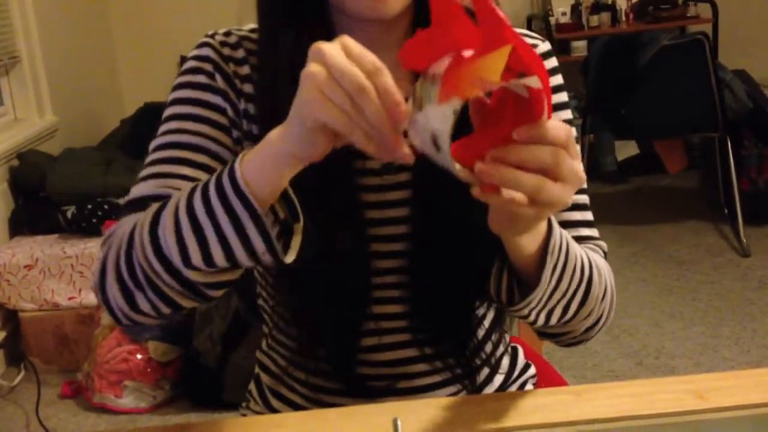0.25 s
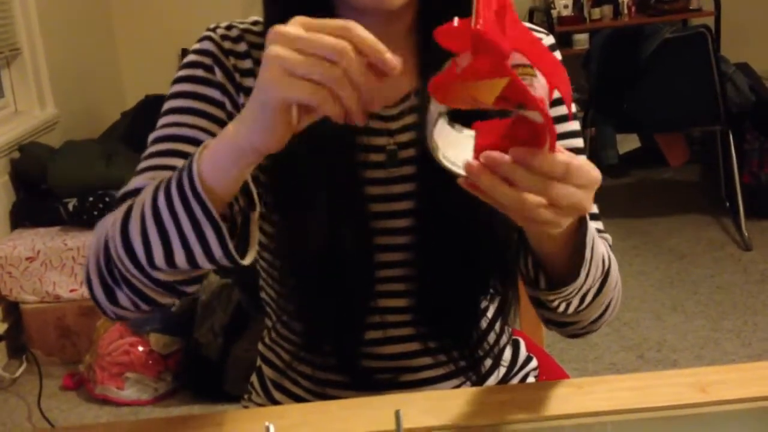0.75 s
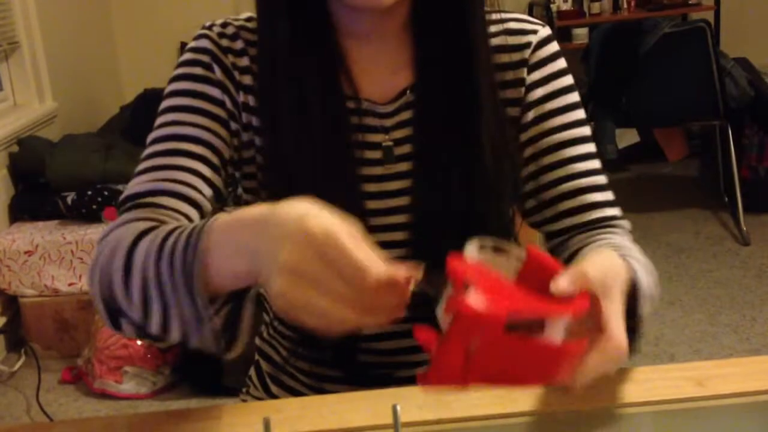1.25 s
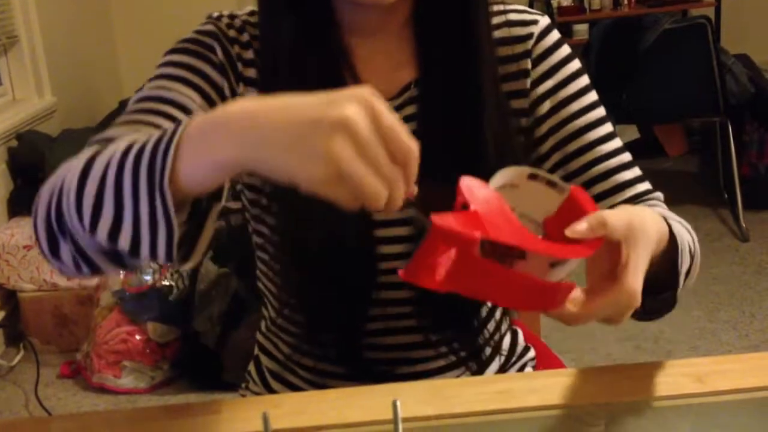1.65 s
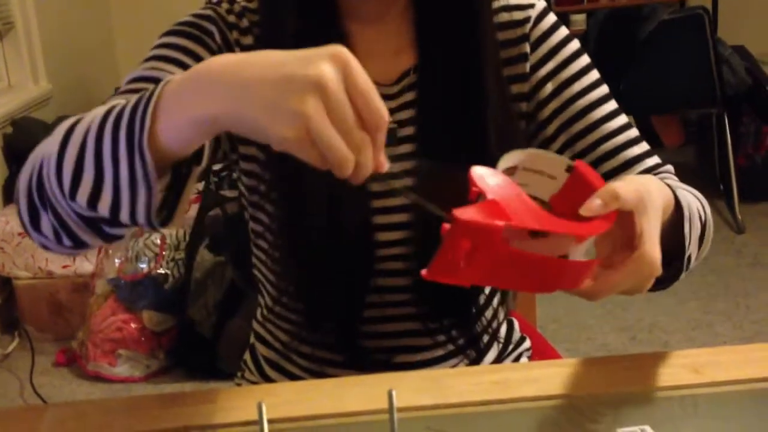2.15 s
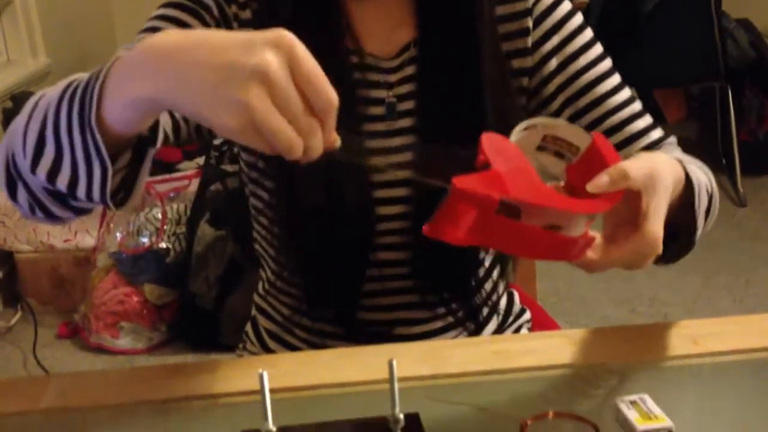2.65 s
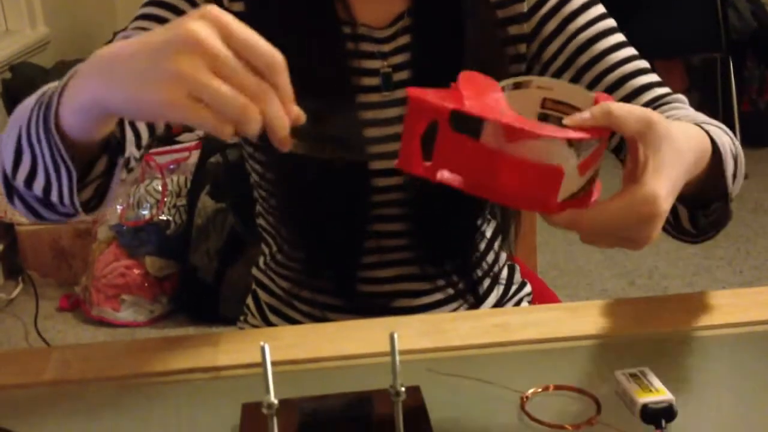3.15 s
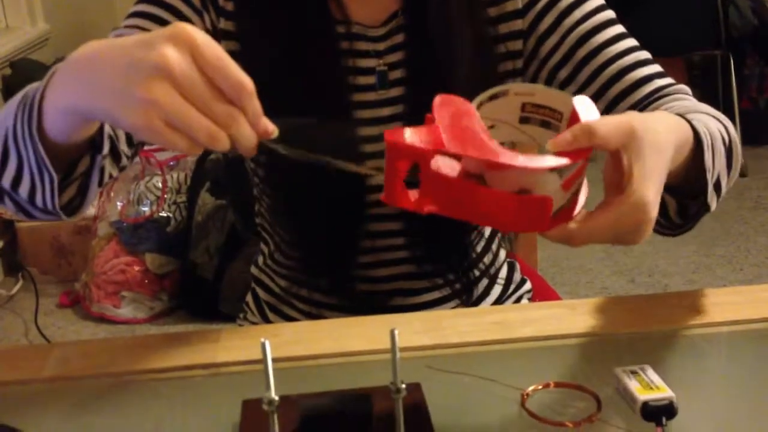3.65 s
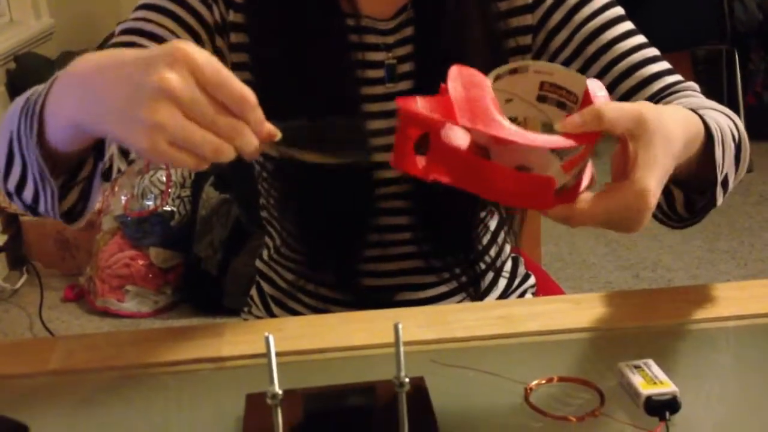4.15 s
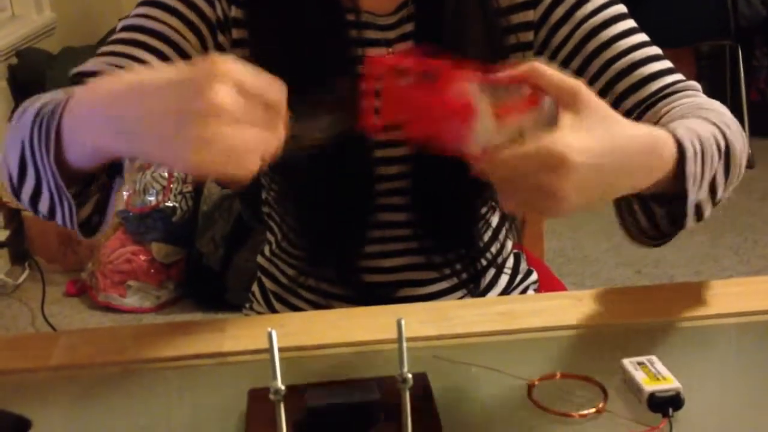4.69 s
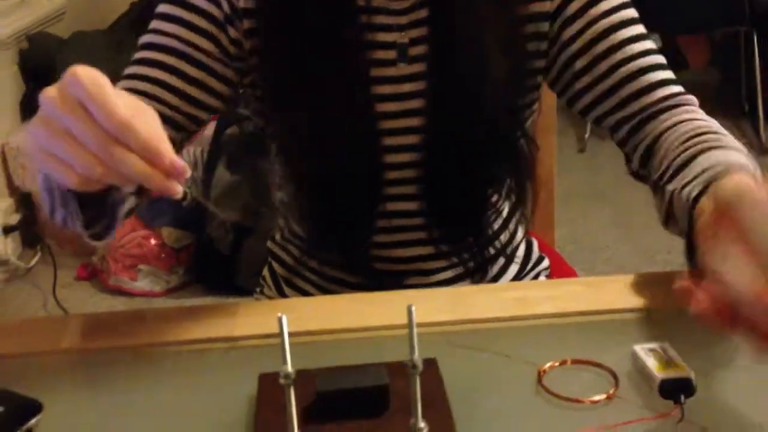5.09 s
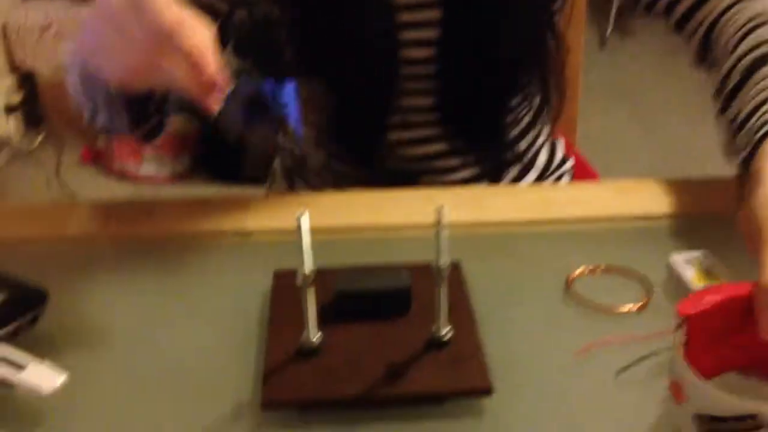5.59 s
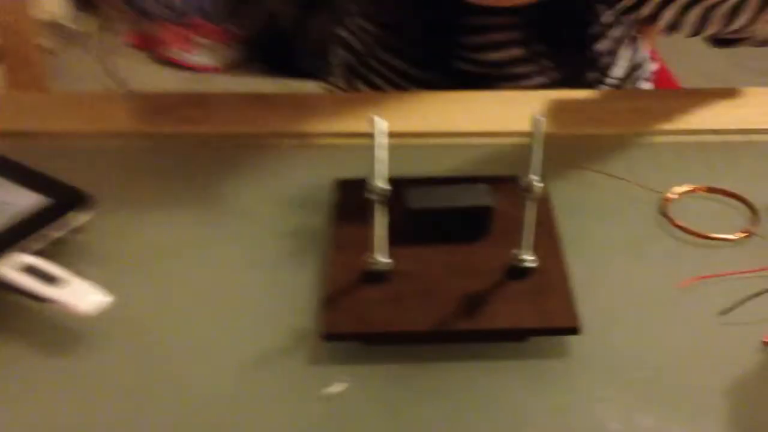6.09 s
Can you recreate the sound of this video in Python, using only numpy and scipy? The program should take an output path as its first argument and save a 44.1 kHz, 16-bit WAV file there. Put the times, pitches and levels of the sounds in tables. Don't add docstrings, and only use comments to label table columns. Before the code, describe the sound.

Sticky tape is jerked off a plastic dispenser in short crackly rips, torn with a ringing snap, then the dispenser knocks down on a table.

```python
import sys
import numpy as np
from scipy import signal
from scipy.fft import rfft, irfft, next_fast_len
from scipy.io import wavfile
from scipy.ndimage import uniform_filter1d, map_coordinates

SR = 44100
rng = np.random.default_rng(int(sys.argv[2]) if len(sys.argv) > 2 else 0)


def wrap_up_sound(samples):
    columns = np.atleast_2d(samples).T
    tamed = np.clip(columns, -1, 1)
    steps = np.round(tamed * 32767).astype(np.int16)
    wavfile.write(sys.argv[1], SR, steps)


def convert_level_to_amplitude(level_db):
    exponent = np.asarray(level_db, float) / 20
    return 10 ** exponent


N = 279153

# centre_hz, width_hz, level_db
FRAME_MODES = [(1130, 840, -12.5), (1930, 1000, -6), (2593, 530, 0.5)]
# centre_hz, width_hz, level_db
ROLL_MODES = [(3840, 420, -2.5), (4470, 400, 1.5), (4970, 480, 3), (5770, 600, -4.5)]
# centre_hz, width_hz, level_db
FILM_MODES = [(6180, 1100, 0), (7350, 1200, 3), (8410, 1800, -0.5), (11630, 1600, -2.5),
              (13300, 2600, -5.5)]
# start_s, core_db, frame_over_roll_db, film_over_roll_db, roll_pitch_factor
PULL_COLOURS = [
    (.465, -40, -4.5, 5, 1.05),
    (1.345, -41, -5, -1, 0.97),
    (1.675, -36.5, -1, 1, 0.99),
    (2.21, -36, -6, 2, 0.93),
    (2.43, -38, -4.5, 2.5, .91),
    (2.74, -45.5, -4, -0.5, 1.06),
    (3.015, -40.5, -5, -4.5, .9),
    (4.8, -38, -4, 2.5, 0.99),
]


def tape():
    # centre_hz, width_hz, level_db
    core_modes = [(186.6, 88, -0.5), (390, 240, 3), (930, 43, -11.5)]
    roll, frame, film = slips()
    start_s, core_db, _, _, pitch = np.transpose(PULL_COLOURS)
    halfway_s = (start_s[1:] + start_s[:-1]) / 2
    pull = np.searchsorted(halfway_s, np.arange(N) / SR)

    crack = np.zeros(N)
    for k, factor in enumerate(pitch):
        tuned_roll = np.multiply(ROLL_MODES, [factor, factor, 1])
        crack += convert_level_to_amplitude(5) * filtered(roll * (pull == k), resonant(tuned_roll))
    crack += convert_level_to_amplitude(5) * filtered(frame, resonant(FRAME_MODES))
    crack += convert_level_to_amplitude(8) * filtered(film, lambda hz: resonant(FILM_MODES)(hz) * (1j * hz / (5200 + 1j * hz)) ** 2)
    crack += convert_level_to_amplitude(core_db[pull] + 24.5) * filtered(roll + 0.3 * film, resonant(core_modes))
    air = filtered(roll, resonant([(70.5, 240, 0)]))
    return crack + convert_level_to_amplitude(-24.5) * air


def slips(gap_s=0.0022, scatter=0.28, size_db=1.0, t60_s=0.01, snap=4.13, rise_s=0.00032, count=28):
    start_s, length_s, first_db, last_db, frame_db, film_db = bursts().T[:, :, None]
    chance = rng.standard_normal((len(start_s), 5, count))
    gaps = gap_s * np.exp(scatter * chance[:, 0])
    late_s = np.cumsum(gaps, axis=1) - gaps[:, :1]
    inside = np.clip((length_s - late_s) / 0.002, 0, 1)
    level_db = first_db + (last_db - first_db) * np.minimum(late_s / length_s, 1)
    where = np.round((start_s + late_s) * SR).astype(int).ravel()
    first_slip = convert_level_to_amplitude(1.5 * (late_s == 0))
    direction = np.sign(chance[:, 4])

    t = np.arange(SR // 20) / SR
    puff = convert_level_to_amplitude(-60 * t / t60_s) * (1 - np.exp(-t / rise_s))
    threads = rng.standard_normal((3, N))
    forces = []
    for k, part_db in enumerate([0, frame_db, film_db]):
        uneven_db = size_db * chance[:, k + 1] * (late_s > 0)
        size = convert_level_to_amplitude(level_db + part_db + uneven_db) * inside
        snaps = np.bincount(where + 8, (size * first_slip * direction).ravel(), N)
        puffs = signal.fftconvolve(np.bincount(where, size.ravel(), N), puff)[:N]
        forces.append(snap * snaps + threads[k] * puffs)
    return forces


def bursts():
    # start_s, length_s, level_db, change_to_end_db
    rips = [(0.4529, 0.002, -17.5, -0.5), (0.455, 0.014, -22.5, 0), (0.4679, 0.009, -22.5, -7.5),
            (0.4788, 0.004, -33.5, 1), (0.4839, 0.002, -24, -1), (1.3318, 0.0056, -14.5, -5),
            (1.3437, 0.0103, -14.5, -13.5), (1.3631, 0.0037, -22.5, -3), (1.3697, 0.003, -23.5, 2),
            (1.637, 0.003, -18, -2), (1.6433, 0.002, -21, 0), (1.648, 0.039, -22.5, 3),
            (2.182, 0.009, -17.5, -0.4), (2.2033, 0.005, -16, -6), (2.218, 0.005, -14.5, -0.5),
            (2.2278, 0.0215, -20.5, -6), (2.3867, 0.0056, -18, -3), (2.3967, 0.0262, -17.5, -1),
            (2.429, 0.0101, -19.5, 0.5), (2.4419, 0.042, -19, -2), (2.7335, 0.0022, -18, 0),
            (3.011, 0.009, -24.5, -3.5), (3.0214, 0.0013, -22, 0), (4.7492, 0.0022, -21, 0),
            (4.7615, 0.0027, -30, 0), (4.7901, 0.0125, -19, 2.5), (4.803, 0.0027, -14, -8.5)]
    # start_s, level_db, frame_over_roll_db, film_over_roll_db
    ticks = [(0.219, -45, 1.5, 16.5), (0.226, -64.5, 3, 23), (0.3905, -40.5, 0, 15), (0.4077, -44.5, -3, 2),
             (0.7772, -44.5, -11, 1), (1.15, -48, -5, -10), (1.2113, -43, 2.5, -19.5),
             (1.2682, -43.5, 4, -9), (1.2772, -23, -15.5, -2.5), (1.412, -40.5, 4, 2),
             (1.5068, -43, -6, -3), (1.541, -59.5, 8, 3), (1.5957, -46, 0, -4), (1.797, -44.5, -1, -1),
             (1.874, -55.5, 2.5, -12), (2.043, -59, -4.5, -14), (2.056, -44, 2, -18), (2.059, -48, 7.5, -3),
             (2.0657, -46.5, 6.5, -9), (2.744, -45, -20, 8), (2.9232, -44.5, -2, 1.5)]
    # start_s, level_db, frame_over_roll_db
    creaks = [(3.348, -64, 8.5), (3.381, -58, 0), (3.3861, -59, 10.5), (3.8988, -60.5, -5.5),
              (3.9456, -63, -2), (4.06, -62, -10), (4.6172, -65, 0), (4.6394, -59.5, 5), (4.685, -71, 7),
              (4.982, -49.5, 3), (5.145, -50.5, 3), (5.158, -51, 3), (5.185, -67, 4), (5.2839, -62.5, 7.5),
              (5.743, -60, 4), (5.8155, -44, -7), (5.822, -52, -2), (5.848, -36, -3), (5.868, -30, -1),
              (5.8905, -45, -12), (6.031, -56.5, -1), (6.040, -59, 1), (6.175, -69, 6.5)]
    rows = []
    for s, length_s, db, change_db in rips:
        nearest = min(PULL_COLOURS, key=lambda pull: abs(pull[0] - s))
        rows.append((s, length_s, db, db + change_db, nearest[2], nearest[3]))
    for s, db, frame_db, film_db in ticks:
        rows.append((s, 0.0023, db, db, frame_db, film_db))
    for s, db, frame_db in creaks:
        film_db = -3 - 0.6 * frame_db
        rows.append((s, 0.00354, db, db - 6, frame_db, film_db))
    return np.array(rows)


def cutter():
    # start_s, level_db, pitch_hz, t60_s
    blade_tones = [
        (4.794, -36, 2587, 0.38),
        (4.796, -33, 2353, 0.15),
        (4.8, -29, 5000, 0.079),
        (5.868, -44, 3340, 0.18),
    ]
    out = np.zeros(N + SR)
    t = np.arange(SR // 2) / SR
    for s, db, hz, t60_s in blade_tones:
        out[round(s * SR):][:len(t)] += convert_level_to_amplitude(db - 60 * t / t60_s) * np.sin(2 * np.pi * hz * t)
    return out[:N] * convert_level_to_amplitude(5.1 * wobble(110))


def set_down():
    # start_s, peak_db, chatter_t60_s, blow_over_chatter_db
    contacts = [
        (5.641, -14, 0.35, 13),
        (5.8436, -17.5, 0.52, 15),
        (5.8667, -13.5, 0.23, 8),
    ]
    # centre_hz, width_hz, level_db
    table_modes = [(457, 75, 1), (650, 34, 4), (800, 56, -2.5), (1160, 65, -0.5), (1450, 72, 4.5),
                   (2610, 550, -15), (4020, 580, -9), (6500, 1300, -15.5), (10600, 4400, -20.5)]
    # centre_hz, width_hz, level_db
    edge_modes = [(304, 75, 16), (1476, 480, -5), (2710, 760, -4), (3400, 300, -3), (6000, 5900, -20)]
    # centre_hz, width_hz, level_db
    blade_modes = [(1550, 570, -11), (2410, 250, 0), (3340, 190, 6), (4750, 310, -5), (7950, 450, -7),
                   (11000, 1100, -14)]
    out = np.zeros(N)
    t = np.arange(SR // 3) / SR
    for (s, db, chatter_t60_s, blow_db), modes in zip(contacts, [table_modes, edge_modes, blade_modes]):
        rattle = convert_level_to_amplitude(-0.5 - 60 * t / 0.042) + convert_level_to_amplitude(-18.5 - 60 * t / chatter_t60_s)
        blow = convert_level_to_amplitude(blow_db) * convert_level_to_amplitude(-60 * t / 0.00025)
        force = np.zeros(N)
        force[round(s * SR):][:len(t)] = rattle * rng.standard_normal(len(t)) + blow
        out += convert_level_to_amplitude(db - 9) * filtered(force, lambda hz: resonant(modes)(hz) * 1j * hz / (160 + 1j * hz))
    return out


def rustle(fade_s=0.064):
    # start_s, end_s, level_db, film_over_body_db
    moves = [
        (0, 6.4, -79.5, -4),
        (0.149, .5, -67.5, 1),
        (1.301, 3.0, -67, -7),
        (3.75, 4.3, -71, -8),
        (4.601, 5.4, -75, -2.5),
        (5.15, 5.33, -66.5, -5),
        (5.5, 6.1, -64.5, -4.5),
        (6.1, 6.8, -70, -1),
    ]
    t = np.arange(N) / SR
    swell = np.array([np.clip(np.minimum(t - start, end - t) / fade_s + 1, 0, 1) for start, end, _, _ in moves])
    _, _, db, film_db = np.transpose(moves)
    grain = unit(convert_level_to_amplitude(1.7 * wobble(27) + 2 * wobble(500)) * rng.standard_normal(N))
    body, film = np.sqrt(convert_level_to_amplitude([db, db + film_db - 3]) ** 2 @ swell ** 4)
    low = filtered(grain, resonant(FRAME_MODES + ROLL_MODES + FILM_MODES[:3]))
    high = filtered(grain, resonant(FILM_MODES[3:]))
    return body * low + film * high


def room(x, delay_s=0.00069):
    # pitch_hz, t60_s
    room_decay = [(150, 0.15), (600, 0.23), (2500, 0.35), (4800, 0.36), (7500, 0.3), (15000, .22)]
    # pitch_hz, level_db
    wall_colour = [(150, 4), (1000, 3.5), (2500, -2), (7000, -1), (15000, 0)]
    hz, t, power = blocks(x, size=256, blur=5)
    t = t[t < 0.6]
    decay = convert_level_to_amplitude(-60 * t / along(room_decay, hz)[:, None])
    tail = (decay * (1 - np.exp(-t / delay_s))) ** 2
    tail *= convert_level_to_amplitude(along(wall_colour, hz))[:, None] ** 2 / tail.sum(axis=1, keepdims=True)
    answer = abs(signal.fftconvolve(power, tail, axes=1)[:, :power.shape[1]])
    return noise_with(answer, size=256, channels=1)[0]


def background():
    # pitch_hz, level_db_per_hz
    hum_tone = [(18, -61.5), (30, -31), (91, -26.5), (106, -13.5), (232, -6.5), (367, -15), (398, -15.5),
                (447, -9), (501, -18), (571, -19), (1500, -26), (1950, -54.5), (3300, -120)]
    # pitch_hz, level_db_per_hz
    hiss_tone = [(530, -36), (900, -3.5), (1320, -15), (1600, -6.5), (1920, -10), (4360, -16), (10000, -26),
                 (15200, -22.5)]
    hum = unit(filtered(rng.standard_normal(N), lambda hz: convert_level_to_amplitude(along(hum_tone, hz))))
    hiss = unit(filtered(rng.standard_normal(N), lambda hz: convert_level_to_amplitude(along(hiss_tone, hz))))
    hum_db = -63 + 2.4 * wobble(27) + 0.43 * wobble(0.58)
    return convert_level_to_amplitude(hum_db) * hum + convert_level_to_amplitude(-68) * hiss


def unit(x):
    return x / np.sqrt(np.mean(x ** 2) + 1e-20)


def along(points, hz):
    f, v = np.transpose(points)
    return np.interp(np.log(hz + 1), np.log(f + 1), v)


def filtered(x, response):
    m = next_fast_len(N + SR // 8)
    return irfft(rfft(x, m) * response(np.fft.rfftfreq(m, 1 / SR)), m)[..., :N]


def resonant(modes):
    def response(f):
        total = 0
        for k, (centre, width, db) in enumerate(modes):
            damping = 1j * f * width
            total = total + (-1) ** k * convert_level_to_amplitude(db) * damping / (centre * centre - f * f + damping)
        return total / np.sqrt(np.mean(abs(total) ** 2))
    return response


def wobble(rate):
    knots = rng.standard_normal(int(N * rate / SR) + 4)
    return map_coordinates(knots, [np.arange(N) * rate / SR])


def blocks(x, size, blur):
    hz, t, z = signal.stft(x, SR, nperseg=size, noverlap=size * 3 // 4)
    return hz, t, abs(uniform_filter1d(abs(z) ** 2, size=blur, axis=0)) + 1e-20


def noise_with(power, size, channels):
    real, imag = rng.standard_normal((2, channels) + power.shape)
    z = (real + 1j * imag) * np.sqrt(power)
    return signal.istft(z, nperseg=size, noverlap=size * 3 // 4)[1][:, :N]


def scene():
    near = tape() + set_down() + cutter()
    mono = near + convert_level_to_amplitude(-8.5) * room(near) + rustle() + background()
    return np.tile(mono, (2, 1))


def smear(x, shared_db=-17, rise_db=8, faint_db=-88, loud_db=-62, low_hz=1900):
    # pitch_hz, level_under_signal_db
    side_noise = [(60, -17), (300, -9.5), (1600, -11), (3000, -18.5), (5000, -13.5), (10000, -14),
                  (14000, -10)]
    hz, _, power = blocks(x, size=3072, blur=91)
    power = power ** 0.46 * power.mean(axis=0) ** 0.41 * (hz[:, None] > 250)
    shared = convert_level_to_amplitude(shared_db) * noise_with(power, size=3072, channels=1)

    hz, _, power = blocks(x, size=1024, blur=21)
    level_db = 10 * np.log10(power.mean(axis=0))
    jump_db = level_db - np.roll(level_db, shift=8)
    attack = np.clip((jump_db - rise_db) / 4, 0, 1) * np.clip((level_db - faint_db) / 3, 0, 1)
    bass = np.clip((level_db - loud_db) / 6, 0, 1) * (hz[:, None] < low_hz)
    gain = np.maximum(attack, bass) * convert_level_to_amplitude(along(side_noise, hz))[:, None]
    return shared + noise_with(power * gain ** 2, size=1024, channels=2)


def roll_off(x):
    return signal.sosfilt(signal.butter(12, 16650, fs=SR, output="sos"), x)


def record(dry):
    x = dry / (1 + abs(dry / 1.2) ** 4) ** (1 / 4)
    x = x + smear(x[0])
    band_limit = [(15300, -1), (15800, -10), (16100, -32.5), (16700, -44), (17200, -90)]  # (Hz, dB)
    x = filtered(x, lambda hz: convert_level_to_amplitude(along(band_limit, hz)))
    return roll_off(x)


dry = scene()
out = record(dry)
wrap_up_sound(out)
```